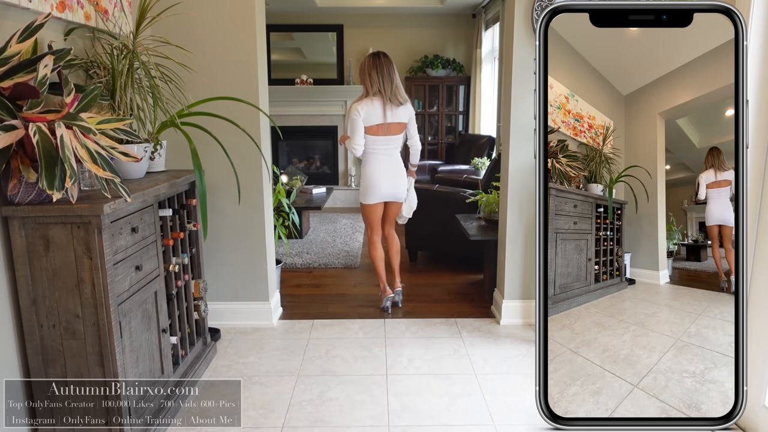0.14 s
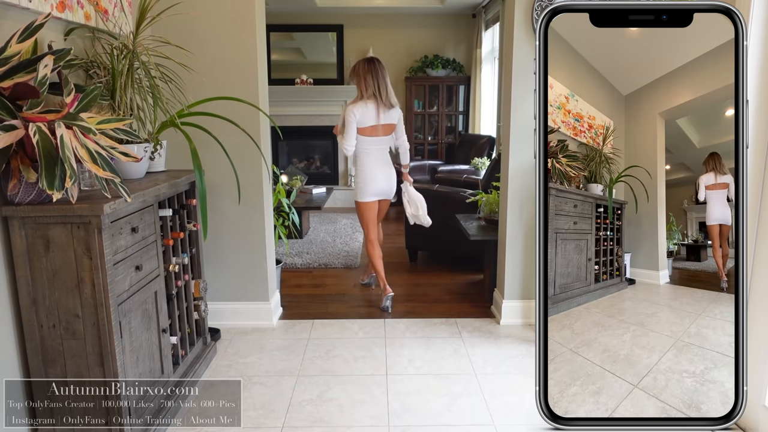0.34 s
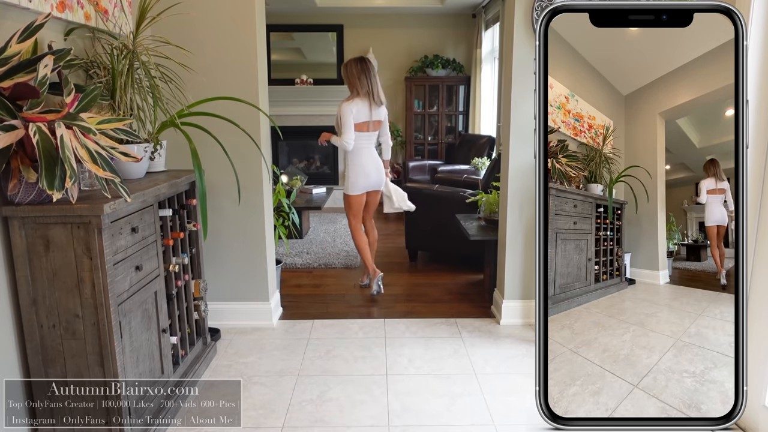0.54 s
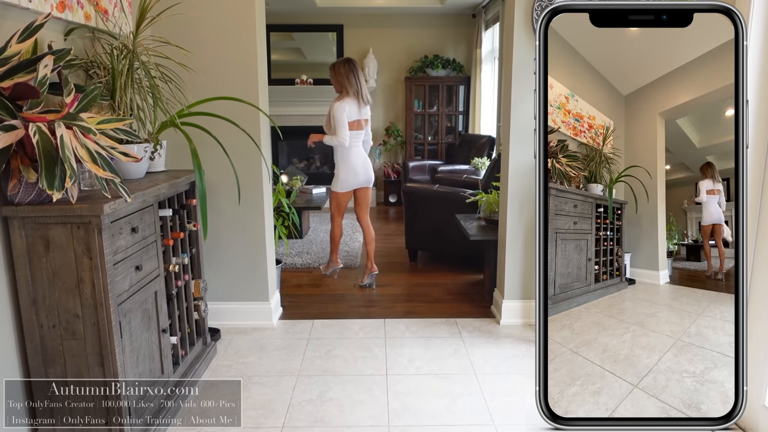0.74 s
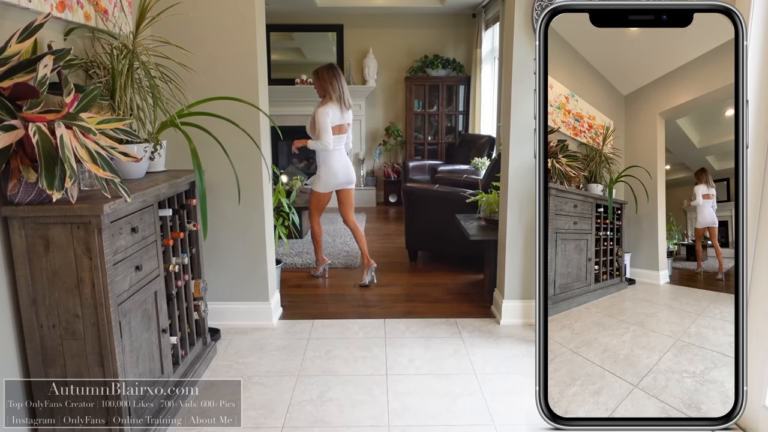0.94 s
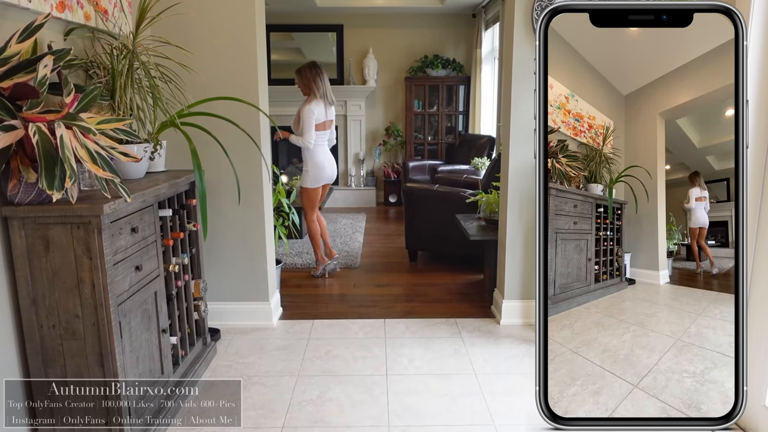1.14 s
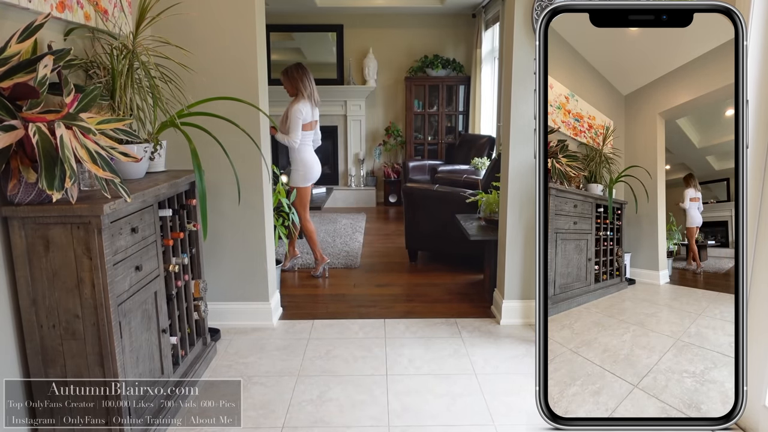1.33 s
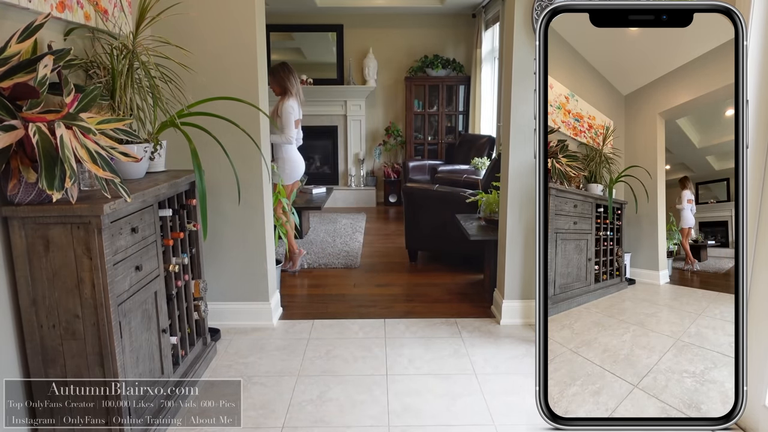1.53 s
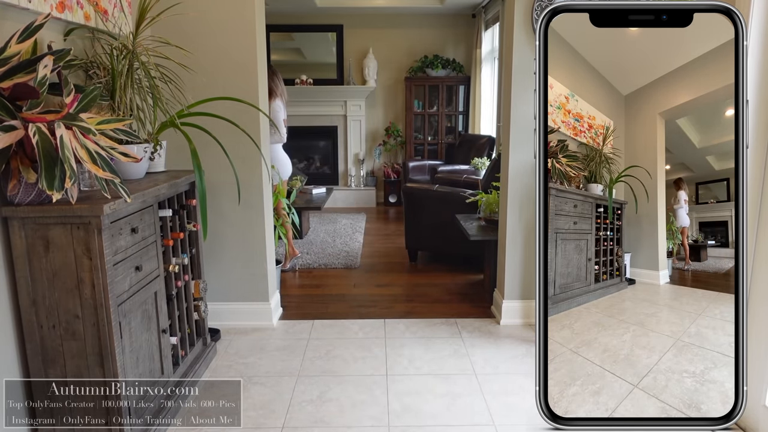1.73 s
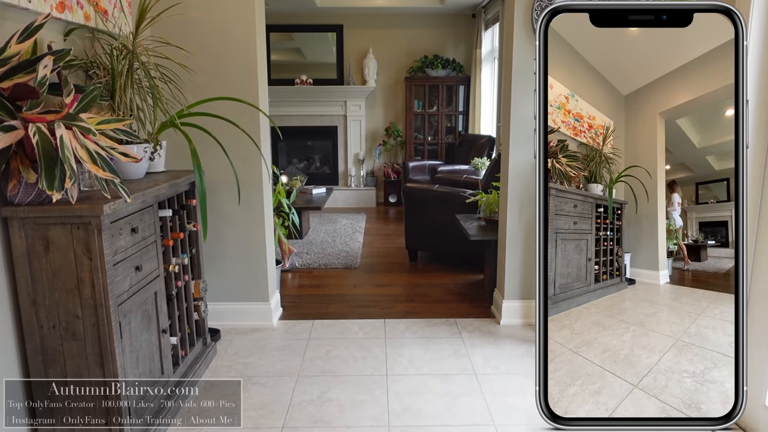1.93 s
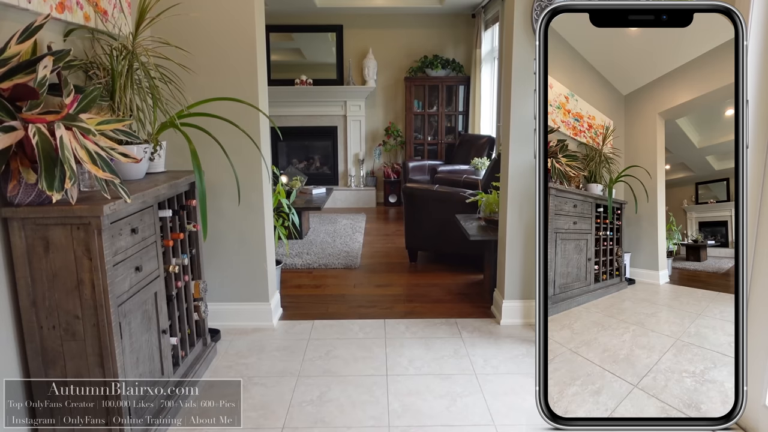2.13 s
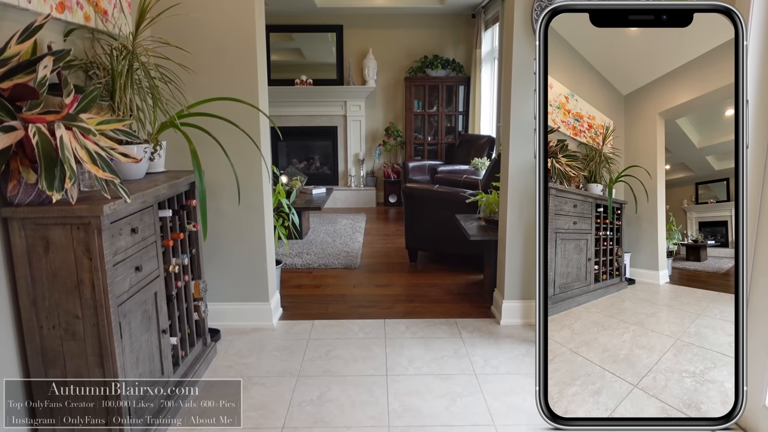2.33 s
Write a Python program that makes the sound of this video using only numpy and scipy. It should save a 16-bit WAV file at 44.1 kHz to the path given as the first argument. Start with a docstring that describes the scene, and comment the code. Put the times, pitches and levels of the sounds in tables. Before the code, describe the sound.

High-heeled footsteps on a wooden floor recede through an open, echoing house. A loud, woody clack lands at the start, then double heel-and-toe knocks near 0.4, 0.9, 1.4 and 1.9 seconds, generally softer. Low board thumps lie under several steps, with light scuffs and dry ticks between. A last dull thump comes near 2.25 seconds. Faint hiss and wavering deep rumble continue throughout.

```python
"""High heels cross a wooden floor in an open, hard-floored house, walking away from a small microphone.
From start to end, shaped noise gives deep rumble and faint hiss; the rumble's level rises and falls.
Throughout, contacts of board, shoe and tip sound as struck modes, and joists boom under several steps as low modes.
Dry ticks, scuffs and swishes are interspersed among them: random grit through a broad resonance.
Contacts, scuffs and swishes are convolved with a room: direct sound, echoes, a tail dying band by band."""
import sys
import numpy as np
from scipy import signal
from scipy.fft import rfft, irfft
from scipy.io import wavfile

SR = 44100
rng = np.random.default_rng(int(sys.argv[2]) if len(sys.argv) > 2 else 0)


def gain_from_db(level_db):
    """Turn a decibel level (scalar or array-like) into a linear amplitude factor."""
    decades = np.asarray(level_db, float) / 20
    return 10 ** decades


def wrap_up_sound(samples):
    """Save the sound to the file named by the first command line argument, as 16-bit audio."""
    columns = np.atleast_2d(samples).T
    # keep every value between -1 and 1, then stretch to whole-number steps
    tamed = np.clip(columns, -1, 1)
    steps = np.round(tamed * 32767).astype(np.int16)
    wavfile.write(sys.argv[1], SR, steps)


N = 104472
LEAD = 2048  # samples of run-in, so that sounds may start before time 0


def evened(x):
    """Normalisation: equal power, rms 1."""
    return x / np.sqrt(np.mean(x ** 2) + 1e-20)


def read(points, hz):
    """Interpolation on a logarithmic frequency axis; a curve that starts below -50 is cut off beneath."""
    f, value = np.transpose(points)
    below = -120 if value[0] < -50 else None
    return np.interp(np.log(hz + 1), np.log(f + 1), value, below)


def add(mix, s, sound):
    """Superposition: pressures add from time s [s] on."""
    part = mix[LEAD + round(s * SR):][:len(sound)]
    part += sound[:len(part)]


def boom(hz, db, rise, t60):
    """Modal resonance: a low joist mode swells and dies exponentially."""
    t = np.arange(SR) / SR
    swell = 1 - np.exp(-t / rise)
    decay = np.sqrt(2) * gain_from_db(db - 60 * t / t60)
    return decay * swell * np.sin(2 * np.pi * hz * t)


# Joists booming under the weight of a step:
# (time [s], frequency [Hz], level [dB], rise [s], T60 [s])
JOIST_BOOMS = [(-.02, 107.7, -44.5, 0.019, 1.7), (0.386, 111.8, -42.5, 0.018, 0.4),
               (.91, 113.6, -54, 0.015, 1.8), (1.226, 65.4, -37, 0.033, 0.2),
               (1.411, 141.7, -42, 0.015, 0.52), (1.886, 143, -39, 0.036, 0.61),
               (2.253, 74.2, -36, 0.0081, 0.43), (2.253, 101.2, -39.5, 0.007, 0.25)]


def joist_booms(mix):
    """Forced response: the weight of a step excites single low modes of the joists."""
    for s, *row in JOIST_BOOMS:
        add(mix, s, boom(*row))


def ring(modes, shifts, sign):
    """Modal superposition: a struck body is a sum of dying sines; sign -1 opposes neighbours in phase."""
    t = np.arange(3000) / SR
    spread = .04  # largest detuning of a mode, as a fraction of its frequency
    total = 0
    for k, ((hz, db, t60), u) in enumerate(zip(modes, shifts)):
        decay = gain_from_db(db - 60 * t / max(t60, .0003))
        total = total + sign ** k * decay * np.sin(2 * np.pi * hz * (1 + spread * u) * t)
    return total


# Modes of each struck part, before detuning, with levels relative within the part:
# (frequency [Hz], level [dB], T60 [s])
BOARD_MODES = [(180, -13.5, 0.025), (335, -10.5, 0.035), (506.7, -0.5, 0.042), (600, 6, 0.014),
               (800, 9.5, 0.0076)]
SHOE_MODES = [(1026, -3.74, 0.0026), (1400, 0.25, 0.0022), (2106, -3.54, 0.0017)]
TIP_MODES = [(2714, 26.5, 0.0013), (3780, 27.5, 0.00067), (4600, -26, 0.0005)]
FIZZ_MODES = [(7420, 12.5, 0.00081), (11340, -6, 0.00038)]
# How long the blow presses on the modes: (board [s], shoe [s], tip [s], fizz [s])
PUSH_S = (0.0012, 0.00049, 0.000093, 0.000021)


def contact(levels_db, shifts):
    """Impact excitation: a force pulse sets modes ringing, and a longer pulse excites less treble."""
    t, out = np.arange(400) / SR, 0
    radiates_hz = 201  # below this the boards hardly sound
    parts = (BOARD_MODES, SHOE_MODES, TIP_MODES, FIZZ_MODES)
    for modes, db, u, push in zip(parts, levels_db, shifts, PUSH_S):
        force = t * np.exp(-t / push * 2)
        body = ring(modes, u, 1 if modes is BOARD_MODES else -1)
        x = signal.lfilter(*signal.butter(2, radiates_hz, "high", fs=SR), np.convolve(body, force))
        # a level of 0 dB has the energy of 20 ms at rms 1
        out = out + gain_from_db(db) * x * np.sqrt(SR / 50 / np.sum(x ** 2))
    return out


# Contacts of shoe and floor, with levels before the room:
# (time [s], board knock [dB], shoe clack [dB], tip tick [dB], fizz [dB])
CONTACTS = [(-.012, -35, -32.5, -43, -52), (.308, -44.5, -49.5, -54, -57.5),
            (0.382, -32, -42.5, -46.5, -57.5), (.453, -69, -42.5, -48, -82), (.457, -76, -38, -48, -61),
            (0.539, -80, -76, -90, -58), (0.874, -56, -87, -57.5, -65.5), (.905, -36.5, -47.5, -54, -70),
            (.981, -44.5, -41, -49.5, -68), (1.223, -58, -73, -56.5, -65), (1.34, -40.5, -54, -57.5, -66.5),
            (1.404, -44.5, -46.5, -56, -57), (1.416, -50, -48, -58, -67), (1.856, -59.5, -86, -56, -60),
            (1.877, -38.5, -56, -56, -71), (1.971, -52, -47, -55.5, -80)]


def steps(mix, responses):
    """Convolution: each blow, slightly detuned, excites the room response of its place."""
    shifts = rng.uniform(-1, 1, (len(CONTACTS), 4, 5))
    for (s, *levels), u, h in zip(CONTACTS, shifts, responses):
        add(mix, s, signal.fftconvolve(contact(levels, u), h))


# First reflections, with delays before jitter and levels relative to the direct sound: (delay [s], level [dB])
ECHOES = [(.0043, -3), (.0078, -10)]
# Reverberation time of the rooms: (frequency [Hz], T60 [s])
ROOM_T60 = [(100, 0.73), (260, 0.7), (700, 0.59), (1840, 0.65), (4850, 0.53), (12800, 0.74)]
# Colour of the tail: (frequency [Hz], relative level [dB])
TAIL_COLOUR = [(100, 3.5), (300, -4.5), (800, 5), (2000, 1), (5000, 1), (12000, -1.5)]


def rooms(times):
    """Reverberation: direct sound and early echoes, with a tail that decays exponentially in each band."""
    size, count = 36000, len(times)
    t = np.arange(size) / SR
    tail_db, build_s = 2.5, 0.0058
    scatter_db, scatter_t60 = -1, .05
    direct_db_per_s = -4  # the walker draws away: direct sound and echoes fade against the room
    echo_jitter = .05  # largest random change of an echo's delay, as a fraction
    direct = gain_from_db(direct_db_per_s * np.array(times))

    # sparse reflections: one tap of random sign in every 20 samples
    taps, grid = np.zeros((count, size)), np.arange(0, size, 20)
    places = grid + rng.integers(0, 20, (count, len(grid)))
    signs = rng.choice([-1., 1.], (count, len(grid)))
    np.put_along_axis(taps, places, signs, 1)

    hz, frame_s, z = signal.stft(taps, SR, nperseg=256)
    t60 = np.maximum(read(ROOM_T60, hz), .05)
    decay_db = read(TAIL_COLOUR, hz)[:, None] - 60 * frame_s / t60[:, None]
    out = signal.istft(z * gain_from_db(decay_db), SR, nperseg=256)[1][:, :size]
    out *= 1 - np.exp(-(t / build_s) ** 2)
    out *= gain_from_db(tail_db) / np.sqrt(np.mean(np.sum(out ** 2, 1)))

    # furniture near the feet scatters densely at first
    near = rng.standard_normal((count, size)) ** 3 * gain_from_db(-60 * t / scatter_t60)
    out += gain_from_db(scatter_db) * near / np.sqrt(np.sum(near ** 2, 1, keepdims=True))

    out[:, 0] += direct
    for s, db in ECHOES:
        at = s * SR * (1 + echo_jitter * rng.uniform(-1, 1, count))
        out[np.arange(count), at.astype(int)] += gain_from_db(db) * direct
    return out


def noise(points):
    """Spectral shaping: white noise weighted by a spectrum, rms 1."""
    weights = gain_from_db(read(points, np.fft.rfftfreq(N, 1 / SR)))
    return evened(irfft(rfft(rng.standard_normal(N)) * weights, N))


# Shape of the rumble's spectrum: (frequency [Hz], relative density [dB per Hz])
RUMBLE_SPECTRUM = [(5, -61), (9, 2), (13, 17.5), (18, -3), (28, 5.5), (40, -28), (60, -59)]
# Course of the rumble: (time [s], level [dB])
RUMBLE_LEVEL = [(0.0, -54), (0.07, -53), (0.47, -41), (0.51, -44), (0.98, -37.5), (1.48, -44.5),
                (2.36, -48)]


def rumble():
    """Amplitude modulation: deep noise follows a slow level curve."""
    level_db = np.interp(np.arange(N) / SR, *np.transpose(RUMBLE_LEVEL))
    return gain_from_db(level_db) * noise(RUMBLE_SPECTRUM)


# Shape of the hush's spectrum: (frequency [Hz], relative density [dB per Hz])
HUSH_SPECTRUM = [(20, -13), (35, -13), (56, -3.5), (86, -23), (300, -39), (370, -24.5), (430, -40),
                 (572, -37.5), (2660, -48), (4900, -49.5), (10000, -58), (14000, -58), (16000, -82)]


def hush():
    """Stationary noise: a steady low bed with faint hiss above it, at -56 dB rms."""
    return gain_from_db(-56) * noise(HUSH_SPECTRUM)


def grit_stroke(length, db, hz, width_hz):
    """Friction as dense random impulses: grit clicks under a short stroke, coloured by one broad resonance."""
    t = np.arange(0, length, 1 / SR)
    clicks_per_s, grit_db = 15000, 3  # mean rate; scale of the random spread in click level
    e, u, g = rng.random((3, SR // 2))[:, :len(t)]
    heights = gain_from_db(-grit_db * np.log(e + 1e-3))
    grit = heights * (u < clicks_per_s / SR) * np.sign(g - .5)
    b, a = signal.iirpeak(min(hz, 18000), max(hz / width_hz, .3), SR)
    coloured = signal.lfilter(b, a, signal.lfilter(b, a, grit))
    stroke = np.sin(np.pi * (t / length) ** .5)  # strongest a quarter of the way through
    return gain_from_db(db) * stroke * evened(coloured)


# Small ticks, with level before the stroke's envelope and width for each of two filter passes:
# (time [s], level [dB], centre [Hz], width [Hz], length [s])
TICKS = [(.24, -58.5, 6800, 1989, 0.0019), (0.52, -65, 11000, 5040, 0.0044), (.585, -62, 8750, 6000, .014),
         (1.04, -64, 9000, 5100, 0.0041), (1.682, -66, 2600, 2500, 0.025),
         (1.82, -68.5, 6400, 2000, 0.0072), (1.82, -73.5, 1850, 700, 0.042), (1.968, -46, 2550, 600, .008),
         (1.98, -61, 7900, 4000, .002), (2.013, -57, 7500, 3000, .002), (2.25, -56.5, 3300, 2550, 0.0048),
         (2.251, -55, 1400, 800, 0.0034)]


def dry_ticks(mix):
    """Free-field sound: brief grit strokes with no room behind them."""
    for s, db, hz, width_hz, length in TICKS:
        add(mix, s, grit_stroke(length, db, hz, width_hz))


# Sole scuffs and cloth swishes, with level before envelope and room, and width for each of two filter passes:
# (time [s], length [s], level [dB], centre [Hz], width [Hz])
SCUFFS = [(0.525, 0.043, -67, 8200, 2530), (0.577, 0.49, -82, 12000, 6960),
          (0.872, 0.013, -55.5, 4050, 5300), (0.936, 0.067, -78, 10900, 6000),
          (1.222, 0.012, -55.5, 3400, 1830), (1.226, 0.017, -69, 11000, 5000),
          (1.417, 0.046, -58.5, 4600, 2980), (1.86, 0.011, -66, 5700, 6140),
          (1.968, 0.0077, -56, 2530, 700), (1.973, 0.1, -72.5, 7200, 4080)]


def scuffs(mix, responses):
    """Convolution: sliding friction of soles and cloth excites the room response of its place."""
    for (s, *row), h in zip(SCUFFS, responses):
        add(mix, s, signal.fftconvolve(grit_stroke(*row), h))


def scene():
    """Superposition of booms, steps, ticks and scuffs over rumble and hush."""
    mix = np.zeros(N + LEAD)
    responses = rooms([row[0] for row in CONTACTS + SCUFFS])
    joist_booms(mix)
    steps(mix, responses[:len(CONTACTS)])
    dry_ticks(mix)
    scuffs(mix, responses[len(CONTACTS):])
    return (mix[LEAD:] + rumble() + hush())[None]


def low_pass(x):
    """Removes everything above the highest recorded frequency."""
    return signal.sosfilt(signal.butter(12, 16230, fs=SR, output="sos"), x)


def record(dry):
    """Low-pass response: the microphone rolls off above 15.8 kHz."""
    dull = signal.lfilter(*signal.butter(2, 15800, fs=SR), dry)
    return low_pass(dull)


dry = scene()
out = record(dry)
wrap_up_sound(out)
```